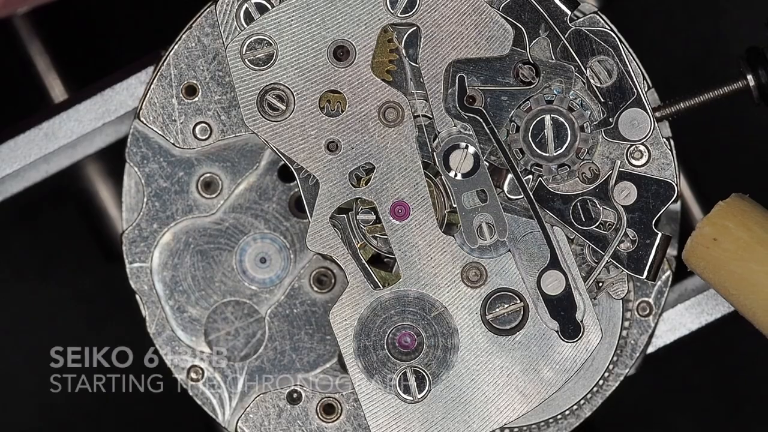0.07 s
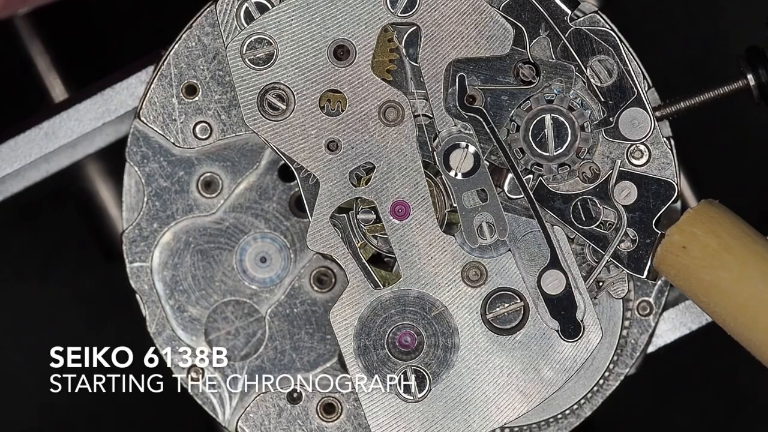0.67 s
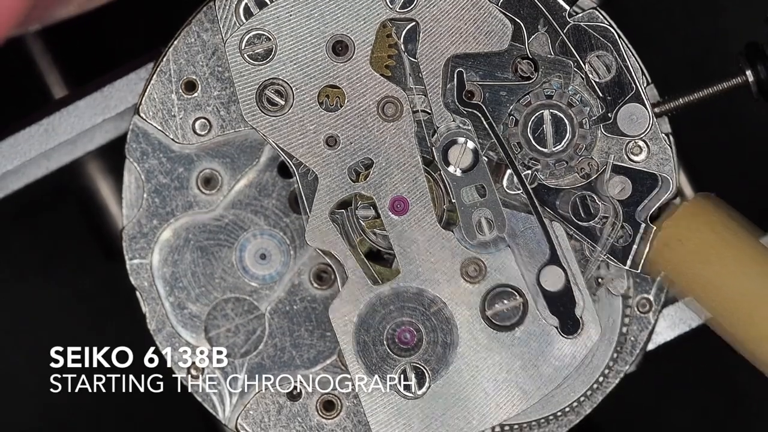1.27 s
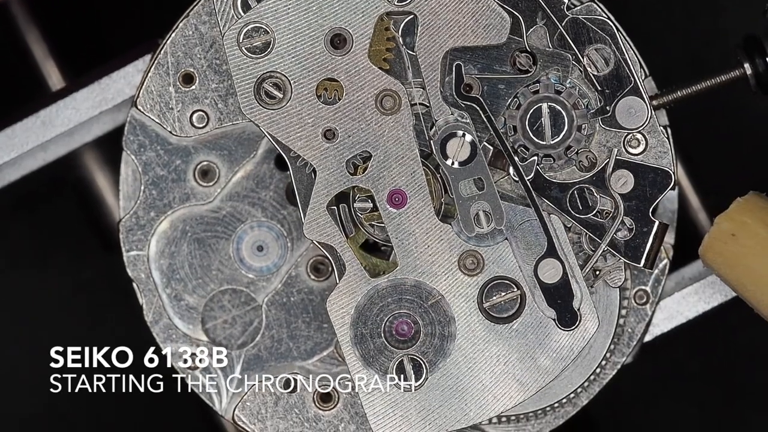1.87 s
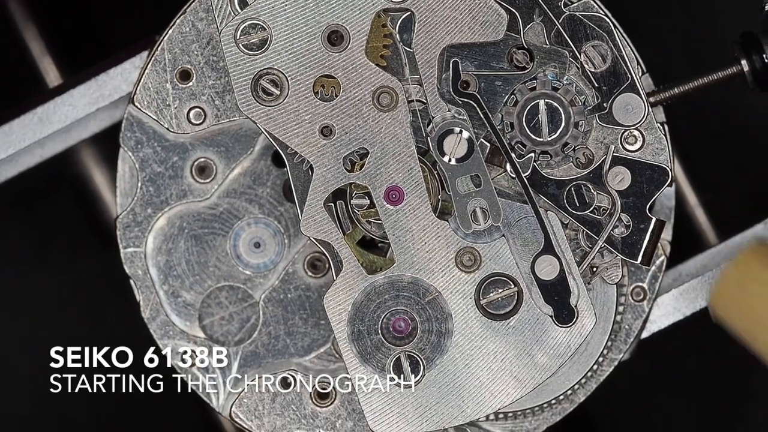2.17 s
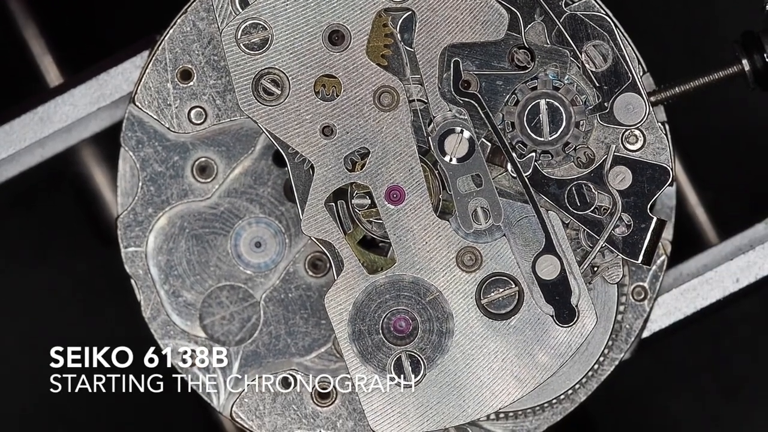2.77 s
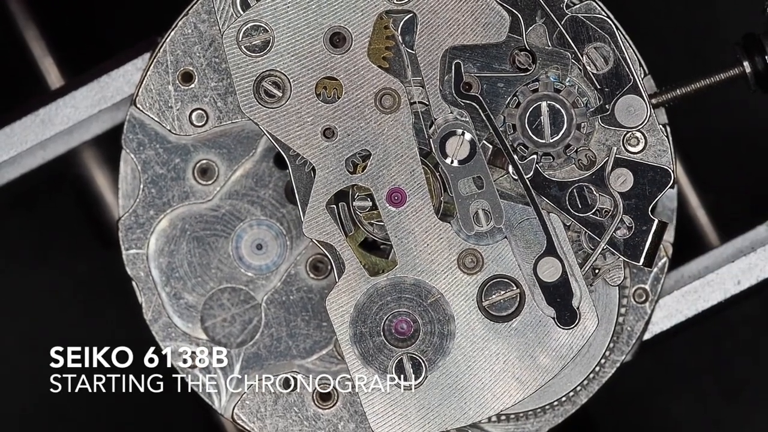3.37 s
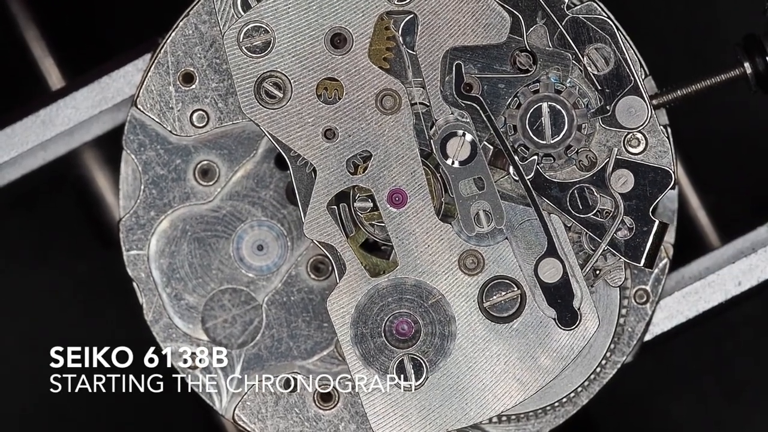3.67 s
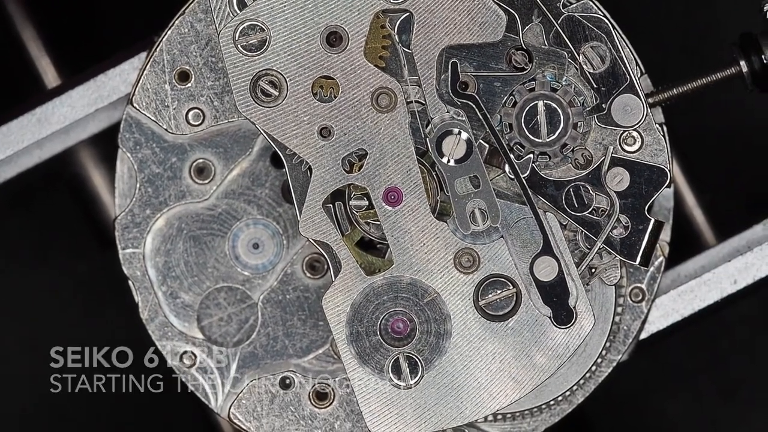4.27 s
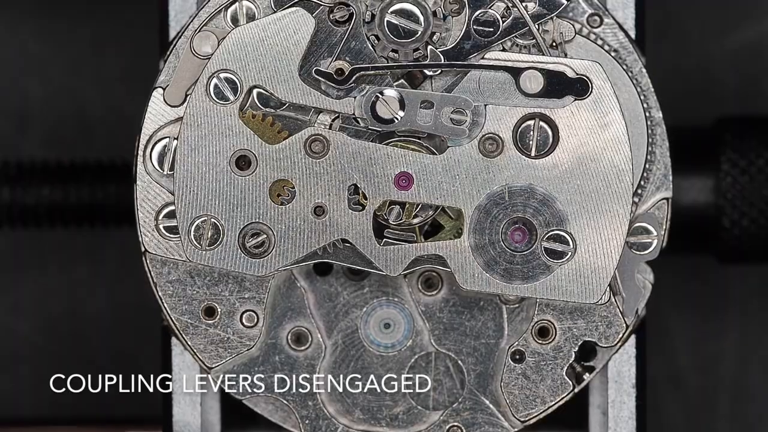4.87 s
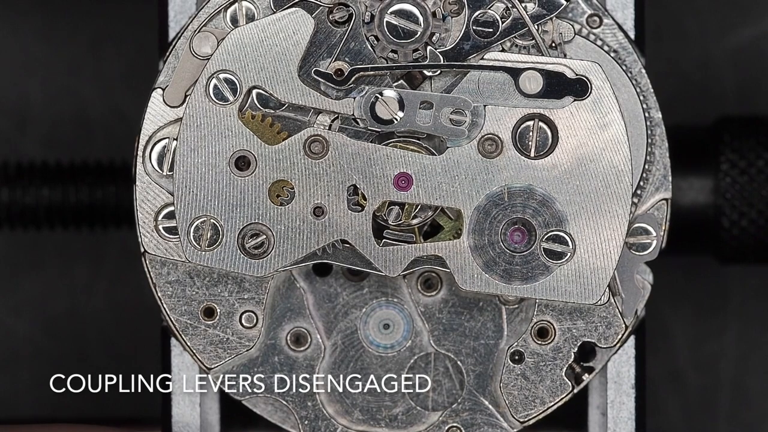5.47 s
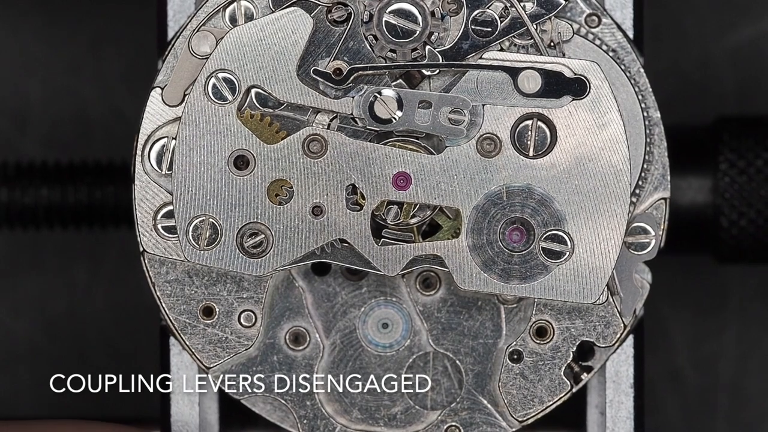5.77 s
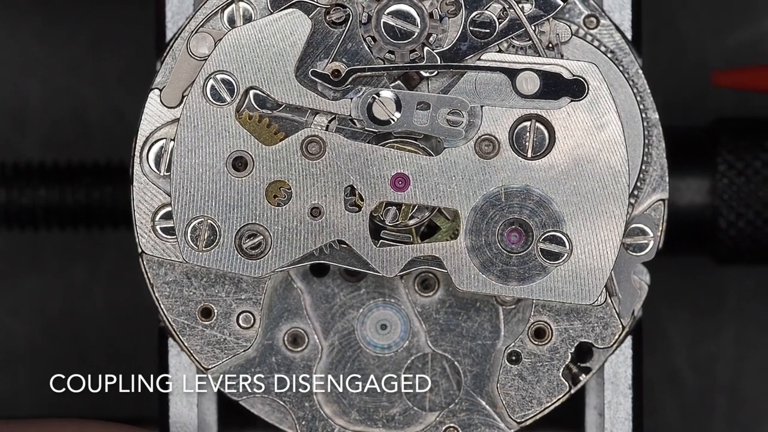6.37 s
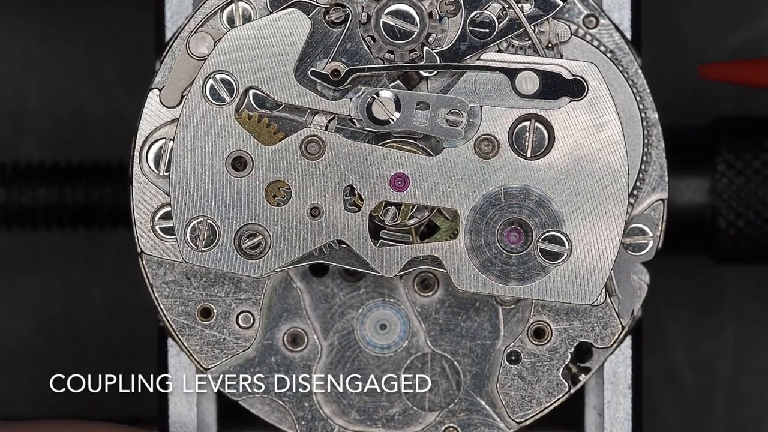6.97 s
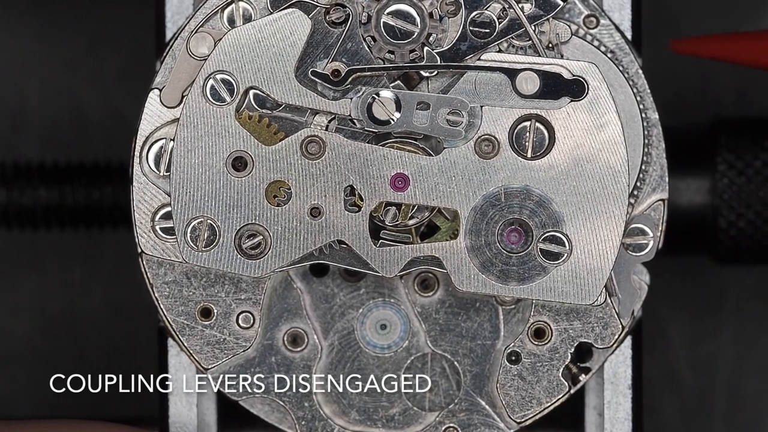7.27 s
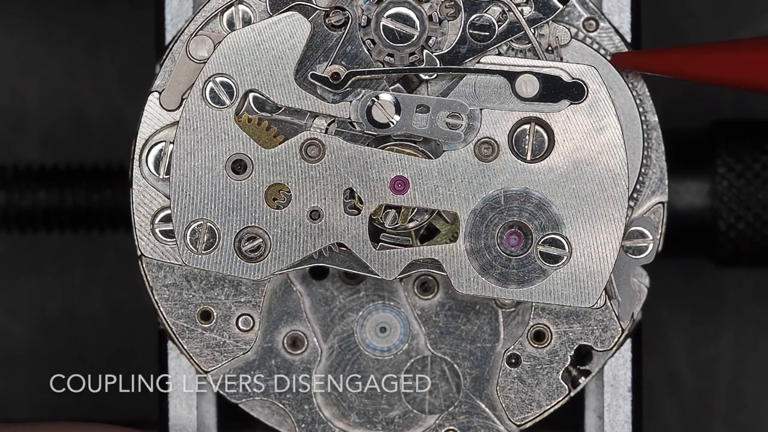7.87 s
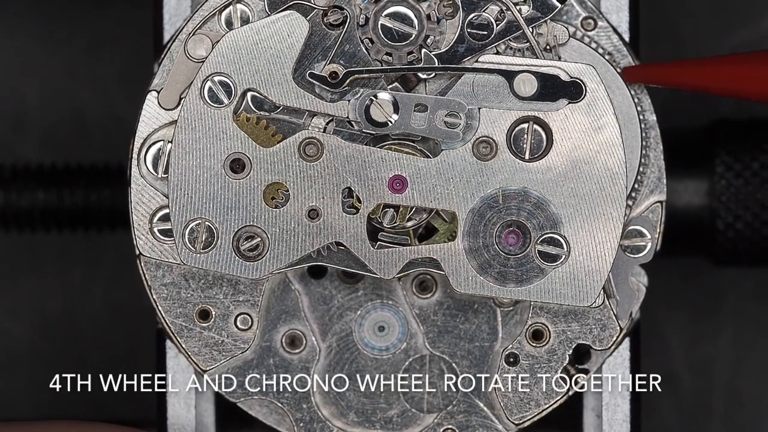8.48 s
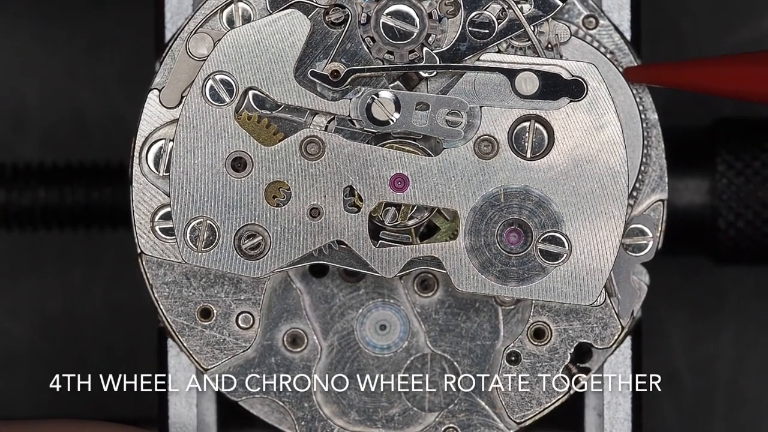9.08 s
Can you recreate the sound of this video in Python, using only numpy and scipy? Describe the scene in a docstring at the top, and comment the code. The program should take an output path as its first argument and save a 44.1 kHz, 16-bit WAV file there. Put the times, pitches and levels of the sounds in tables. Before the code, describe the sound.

One sharp steel click from a watch lever, followed by small wooden ticks, soft finger taps and a faint low hum.

```python
"""Two faint ticks of wood, then a sharp steel snap: a stick presses the lever of a small watch movement,
clamped in a holder on a workbench, close to a pair of microphones. The snap rings the steel and rocks the
holder; the lever clicks back, and the stick slips off, rattling the loose rim. The sound breaks off for a
moment and returns in a slightly louder room with a low drone, while a hand taps and brushes the mat on the
bench."""
import sys
import numpy as np
from scipy import signal
from scipy.fft import rfft, irfft, next_fast_len
from scipy.io import wavfile
from scipy.ndimage import uniform_filter1d, map_coordinates

SR = 44100
rng = np.random.default_rng(int(sys.argv[2]) if len(sys.argv) > 2 else 0)


def put_to_file(sound):
    """Save the sound as 16-bit audio at rate SR, in the file named by the first command-line argument."""
    columns = np.atleast_2d(sound).T  # one column per channel
    safe = np.clip(columns, -1, 1)
    whole_steps = np.round(safe * 32767)
    wavfile.write(sys.argv[1], SR, whole_steps.astype(np.int16))


N = 403074

# Steel contacts. Each row: start in seconds, ring in dB, chatter in dB, chatter t60 in seconds.
LEVER_CLICKS = [(1.3343, -5.5, -8, 0.0087), (1.6321, -35, -34, .015), (2.258, -39, -52, .008),
                (2.5647, -41, -52.5, .008)]
# The holder rocking. Each row: start in seconds, level in dB, pitch in Hz, rise in seconds,
# bench ring in dB.
HOLDER_KNOCKS = [(1.3334, -7, 416, 0.0014, -3.5), (1.3352, -16.5, 215, 0.0027, -22),
                 (1.6325, -28, 523, 0.0027, -28), (1.6322, -37, 226, 0.0039, -42),
                 (2.2449, -37.5, 480, 0.0033, -32)]
# The stick against the rim. Each row: start in seconds, ring in dB, crack in dB.
STICK_TICKS = [(1.1793, -56, -48.5), (1.267, -60, -49.5), (1.6330, -42, -32.5), (2.2452, -39, -45.5),
               (2.2570, -25, -39), (2.2705, -33, -52), (2.5637, -39, -41.5), (3.2206, -47, -56)]
# The stick over the holder. Each row: start and length in seconds, body in dB, hiss in dB.
STICK_SCRAPES = [(2.517, 0.025, -62, -47.5), (2.569, .022, -53.5, -56), (3.747, .025, -70, -60.5),
                 (3.983, .042, -50.5, -58.5), (4.0407, .026, -44.5, -50)]
# The loose rim as the stick leaves: start in seconds, level in dB, t60 in seconds.
RIM_RATTLE = (2.258, -44.5, 0.15)
# Fingertips on the mat. Each row: start in seconds, level in dB.
FINGER_TAPS = [(5.1183, -44), (5.2086, -45), (5.3963, -38), (5.7464, -40.5), (5.9544, -40), (7.2118, -34),
               (7.4028, -42)]
# The hand over the mat. Each row: start and length in seconds, level in dB.
HAND_SLIDES = [(5.799, 0.14, -51), (5.942, 0.076, -51.5), (6.03, 0.11, -51.5), (6.179, 0.089, -51.5)]

# Resonances on the bench and in the room. Each row: frequency in Hz, level in dB, t60 in seconds.
MOVEMENT_MODES = [(715, -19.5, 0.025), (1364, -16.5, 0.041), (1630, -20, 0.022), (1810, -16, 0.022),
                  (2210, -20.5, 0.017), (2700, -18, 0.015), (3250, -20, 0.015), (4480, -11.5, 0.0078),
                  (6400, -19, 0.012), (7290, -19.5, .01), (8940, -22.5, .012), (11730, -26, .014),
                  (13330, -25, .028), (14000, -28, .02), (14700, -23.5, .015)]
BENCH_MODES = [(100.6, -25, .3), (218, -18, .11), (275, -25, 0.18), (442, -30, 0.14), (480, -28, .11)]
STICK_MODES = [(800, -16, 0.022), (1310, -17.5, .035), (1780, -13.5, 0.024), (2275, -8.5, .016),
               (2720, -6.5, .014), (3180, -12.5, 0.0056), (4100, -23, 0.0039), (5200, -23, 0.0092)]
RIM_MODES = [(2000, -8, .012), (2270, -1, .02), (2460, 0.5, .02), (2720, -3, 0.017)]
MAT_MODES = [(872, 2, 0.024), (1030, 0, 0.015), (1400, -3.5, .022), (1890, -10, 0.03), (2500, -5, 0.014),
             (3100, -2.5, .014), (4250, -5, .005)]
DRONE_MODES = [(113.7, 5, 0.65), (211, -9, 0.11)]
EARLY_MURMUR_MODES = [(425, -0.5, 0.044), (498, -3.5, 0.036), (667, -1, 0.029), (1360, -9.5, .025),
                      (2960, -8, 0.0073), (5800, -14, 0.0032)]
LATE_MURMUR_MODES = [(431, 1, 0.028), (509, -2, 0.042), (670, -3, 0.028), (1368, -6.5, 0.039),
                     (1770, -8, 0.021), (2940, -4.5, .005), (5860, -8, 0.0076)]

# Spectra of contact noise, room tone and room tail. Each row: frequency in Hz, relative level in dB.
STEEL_CHATTER = [(300, -29), (1500, -7.5), (4200, 2.5), (6000, -0.5), (10000, -3.5), (13500, 9.5),
                 (16000, 2)]
WOOD_CRACK = [(300, -9.5), (1900, -8), (2750, 6.5), (3500, -5), (4300, 2), (5500, -13), (10000, -11.5),
              (16000, -16)]
SCRAPE_BODY = [(150, -10), (430, -1), (800, -0.5), (1100, -3), (1370, 3), (1650, -8), (2050, -6),
               (4000, -17), (12000, -37.5)]
SCRAPE_HISS = [(1000, -20), (3000, -7), (6300, -4), (7500, 0), (8800, -6.5), (10000, -4.5), (13000, -6.5),
               (16000, -6)]
EARLY_AIR = [(22, -36.5), (34, -6), (76, -6), (109, -1.5), (145, -5.5), (207, -7), (310, -15.5),
             (420, -10.5), (750, -12), (1100, -17.5), (2300, -20.5), (4100, -23.5), (6500, -23.5),
             (15500, -29.5)]
LATE_AIR = [(22, -35), (30, -2), (40, -0.5), (74, -3.5), (150, -2.5), (215, 0), (320, -13), (500, -9.5),
            (820, -8.5), (1150, -16), (2300, -19.5), (4100, -21.5), (6500, -22.5), (15500, -28)]
TAIL_COLOUR = [(60, -13), (220, 2), (500, 0), (800, -5), (1150, -7), (1370, 1.5), (1650, -7), (2500, -3.5),
               (4300, -6.5), (7500, -3), (10000, -2.5), (13000, -2), (16000, -3)]

# The drone's slow swell. Each row: time in seconds, level in dB before DRONE_GAIN_DB.
DRONE_SWELL = [(4.66, -50), (5.16, -49), (5.6, -55), (5.78, -46), (6.44, -49), (6.49, -57), (7.24, -50),
               (7.81, -54), (7.86, -46), (8.54, -56), (8.9, -50), (9.12, -59)]
DRONE_GAIN_DB = 0.8
# The room's decay. Each row: frequency in Hz, t60 in seconds.
ROOM_DECAY = [(100, 0.22), (500, 0.22), (1500, 0.29), (5000, .2), (14000, 0.13)]
# Room tone across the pair. Each row: frequency in Hz, left-right correlation from -1 to 1.
AIR_CORRELATION = [(60, 0.54), (150, 0.5), (380, 0.43), (950, 0.51), (2380, -0.053), (5980, 0.041),
                   (15000, -0.092)]
# The sound either side of the gap. Each row: start and end in seconds.
AUDIBLE_SPANS = [(.088, 4.523), (4.637, 9.2)]


def lever():
    """Each steel contact chatters and rings the watch movement."""
    out = np.zeros(N)
    for start, ring_db, chatter_db, t60 in LEVER_CLICKS:
        chatter = amp(chatter_db) * crack(STEEL_CHATTER, t60)
        add(out, start, amp(ring_db) * ring(MOVEMENT_MODES) + chatter)
    return out


def holder():
    """The released force rocks the holder for a few cycles, and the bench rings on underneath."""
    out, t = np.zeros(N), seconds(.5)
    bench = ring(BENCH_MODES) * (1 - np.exp(-t / 0.017))
    for start, db, hz, rise, bench_db in HOLDER_KNOCKS:
        envelope = (t / rise * np.exp(1 - t / rise)) ** 2
        rock = -envelope * np.sin(2 * np.pi * hz * t)
        add(out, start, amp(db) * rock + amp(bench_db) * bench)
    return out


def stick():
    """Dry wood ticks against the rim and scrapes over the holder in short grainy strokes."""
    out = np.zeros(N)
    for start, ring_db, crack_db in STICK_TICKS:
        add(out, start, amp(ring_db) * ring(STICK_MODES) + amp(crack_db) * crack(WOOD_CRACK, t60=.014))
    body, hiss, grain = noise(SCRAPE_BODY), noise(SCRAPE_HISS), stick_slip(rough_db=0.5)
    for start, length, body_db, hiss_db in STICK_SCRAPES:
        out += stroke(start, length) * grain * (amp(body_db) * body + amp(hiss_db) * hiss)
    return out


def rim_rattle():
    """Tiny rapid contacts keep the loose rim's close modes buzzing as they die away."""
    out, t = np.zeros(N), seconds(.5)
    start, db, t60 = RIM_RATTLE
    buzz = resonate(rng.standard_normal(N) * stick_slip(rough_db=1), RIM_MODES)
    add(out, start, buzz[:len(t)] * amp(db - 60 * t / t60))
    return out


def hand():
    """Finger taps and sliding friction excite the same modes of the work mat."""
    taps, t = np.zeros(N), seconds(.5)
    blow = ring(MAT_MODES) * (1 - np.exp(-t / 0.00055))
    # a soft fingertip cannot drive the high modes
    tap = filtered(blow, lambda hz: 1 / (1 + 1j * hz / 1700) ** 2)
    for start, db in FINGER_TAPS:
        add(taps, start, amp(db) * tap)
    friction = rng.standard_normal(N) * stick_slip(rough_db=2)
    rub = resonate(friction, MAT_MODES) + amp(-8.5) * noise(SCRAPE_HISS)
    pressure = sum(amp(db) * stroke(start, length) for start, length, db in HAND_SLIDES)
    return taps + rub * uniform_filter1d(pressure, size=SR // 30)


def drone():
    """Noise-driven low resonances swell, sink and waver behind the bench sounds."""
    t = np.arange(N) / SR
    hum = signal.hilbert(resonate(rng.standard_normal(N), DRONE_MODES))
    # evened out, so that only its quick flutter is left under the slow swell
    power = uniform_filter1d(abs(hum) ** 2, size=SR // 8)
    even_hum = unit_rms(hum.real / np.sqrt(power))
    swell = amp(np.interp(t, *np.transpose(DRONE_SWELL)) + DRONE_GAIN_DB)
    return even_hum * swell * waver(depth_db=1.0, step_s=0.13)


def room_tail(x):
    """The room answers with a short diffuse tail, different at each microphone."""
    hz, t, bands = signal.stft(rng.standard_normal((2, SR // 2)), SR, nperseg=256)
    decay = amp(-60 * t / curve_at(ROOM_DECAY, hz)[:, None])
    tail = signal.istft(bands * decay, SR, nperseg=256)[1]
    tail = filtered(tail / np.linalg.norm(tail[0]), lambda hz: amp(curve_at(TAIL_COLOUR, hz)))
    # long waves reach both microphones alike
    tail[1] += filtered(tail[0] - tail[1], lambda hz: 1 / (1 + (hz / 1200) ** 2))
    delayed = np.pad(x, (SR // 300, 0))  # about 3 ms behind the direct sound
    return signal.fftconvolve(delayed[None], tail, axes=1)[:, :N]


def room_tone(spectrum, modes, air_db, murmur_db):
    """Air across the pair: partly alike in the bass, wide in the treble, a hollow murmur in the centre."""
    spread = lambda hz: np.arccos(curve_at(AIR_CORRELATION, hz)) / 2
    mid = filtered(noise(spectrum), lambda hz: np.cos(spread(hz)))
    side = filtered(noise(spectrum), lambda hz: np.sin(spread(hz)))
    murmur = resonate(rng.standard_normal(N), modes)
    return amp(air_db) * np.array([mid + side, mid - side]) + amp(murmur_db) * murmur


def background():
    """The room is quiet at first; after the gap it is a little louder and carries the drone."""
    low_drone = drone()
    early = room_tone(EARLY_AIR, EARLY_MURMUR_MODES, air_db=-52.5, murmur_db=-58.5)
    late = room_tone(LATE_AIR, LATE_MURMUR_MODES, air_db=-51, murmur_db=-57)
    gap_start = AUDIBLE_SPANS[0][1]
    return np.where(np.arange(N) / SR < gap_start, early, late + low_drone)


def close_pair(x, lead_s, treble_db):
    """The right microphone hears slightly earlier and gains the treble that the left one loses."""
    left = lambda hz: np.exp(-1j * np.pi * hz * lead_s) * amp(-treble_db * hz / (hz + 1500))
    return filtered(x, lambda hz: np.array([left(hz), 1 / left(hz)]))


def ring(modes):
    """Half a second of damped modes after one blow; neighbours swing in opposite directions."""
    t = seconds(.5)
    return sum((-1) ** k * amp(db - 60 * t / t60) * np.sin(2 * np.pi * hz * t)
               for k, (hz, db, t60) in enumerate(modes))


def resonate(force, modes):
    """The answer of a set of modes to a force, at rms 1."""
    return unit_rms(signal.fftconvolve(force, ring(modes))[:N])


def crack(spectrum, t60):
    """The brief chatter of two hard surfaces meeting, with the same energy at every draw."""
    t = seconds(.5)
    fade = amp(-60 * t / t60)
    return unit_rms(noise(spectrum, size=len(t)) * fade) * np.sqrt(np.mean(fade ** 2))


def stroke(start, length):
    """A rounded swell of contact pressure that takes hold quickly."""
    progress = np.clip((np.arange(N) / SR - start) / length, 0, 1)
    return np.cbrt(4 * progress * (1 - progress))


def stick_slip(rough_db):
    """Surfaces catch and let go: a gain that jumps about from millisecond to millisecond."""
    jitter = unit_rms(uniform_filter1d(rng.standard_normal(N), size=44))
    return unit_rms(amp(rough_db * jitter))


def waver(depth_db, step_s):
    """A gain that glides to a new random value every step."""
    steps = np.arange(N) / SR / step_s
    return amp(depth_db * map_coordinates(rng.standard_normal(512), [steps]))


def noise(spectrum, size=N):
    """Coloured noise of rms 1."""
    return unit_rms(filtered(rng.standard_normal(size), lambda hz: amp(curve_at(spectrum, hz))))


def filtered(x, response):
    """x through a complex frequency response."""
    size = x.shape[-1]
    padded = next_fast_len(size + SR // 4)
    return irfft(rfft(x, padded) * response(np.fft.rfftfreq(padded, 1 / SR)), padded)[..., :size]


def curve_at(points, hz):
    """Interpolate (Hz, value) points on a log frequency axis."""
    freqs, values = np.transpose(points)
    return np.interp(np.log(hz + 1), np.log(freqs + 1), values)


def add(track, start, sound):
    """Mix a sound into a track at a start in seconds."""
    part = track[round(start * SR):][:len(sound)]
    part += sound[:len(part)]


def amp(db):
    return 10 ** (np.asarray(db) / 20)


def unit_rms(x):
    return x / np.sqrt(np.mean(x ** 2) + 1e-20)


def seconds(length):
    return np.arange(int(length * SR)) / SR


def scene():
    """The bench close up, with a little of the room's tail and its steady air behind."""
    near = lever() + holder() + stick() + rim_rattle() + hand()
    direct = close_pair(near, lead_s=23e-6, treble_db=0.8)
    return direct + amp(-12.5) * room_tail(near) + background()


def record(dry):
    """Two stretches of sound with a moment of silence between, and nothing above 15850 Hz."""
    t = np.arange(N) / SR
    audible = sum((t >= start) & (t < end) for start, end in AUDIBLE_SPANS)
    return filtered(dry * audible, lambda hz: hz < 15850)


dry = scene()
out = record(dry)
put_to_file(out)
```